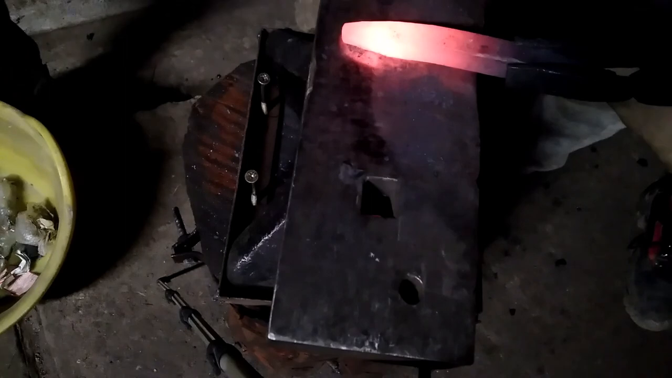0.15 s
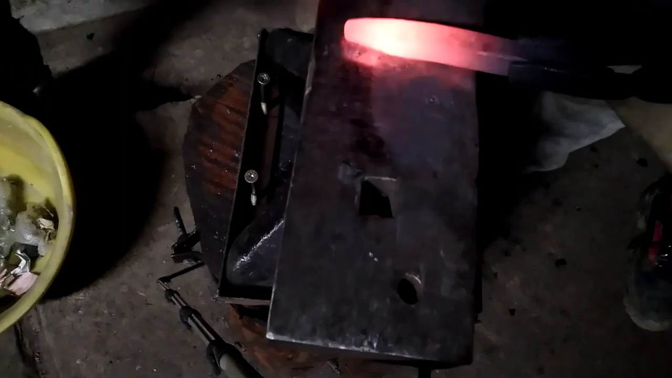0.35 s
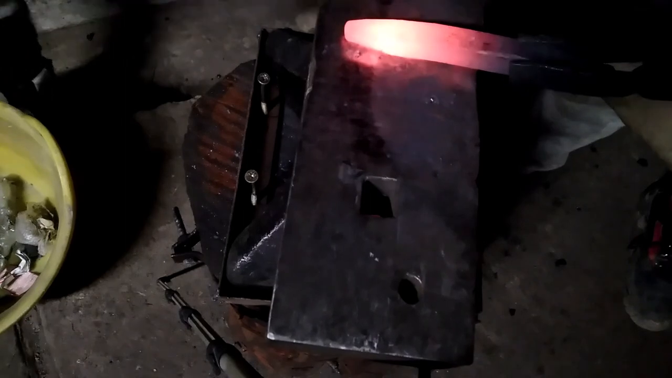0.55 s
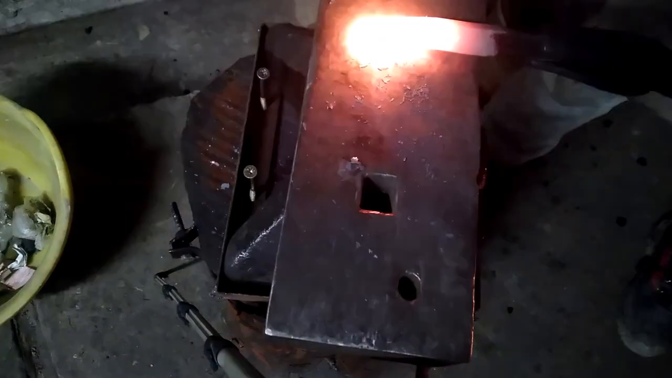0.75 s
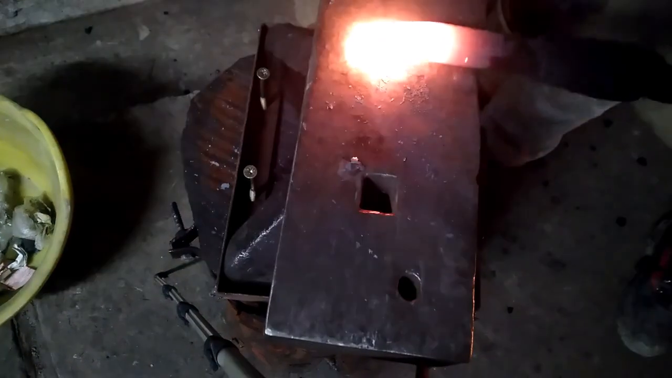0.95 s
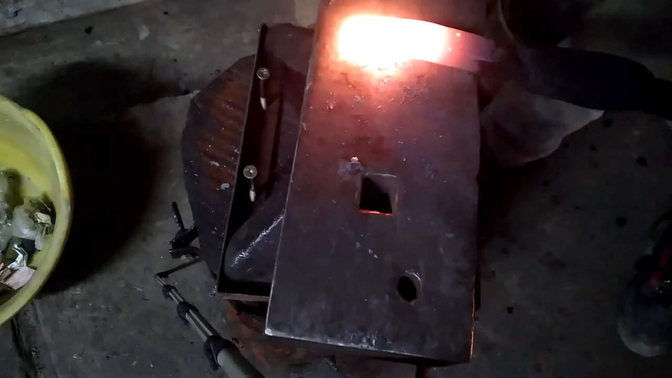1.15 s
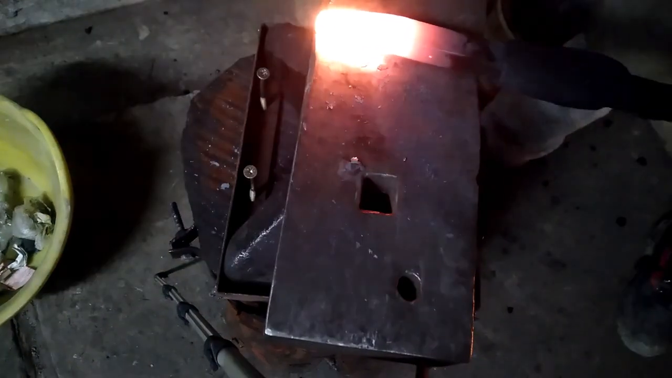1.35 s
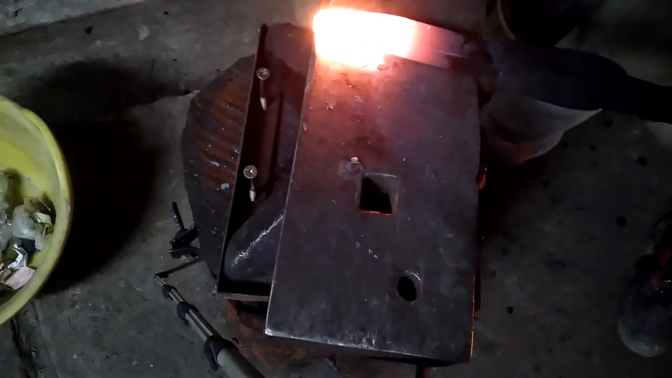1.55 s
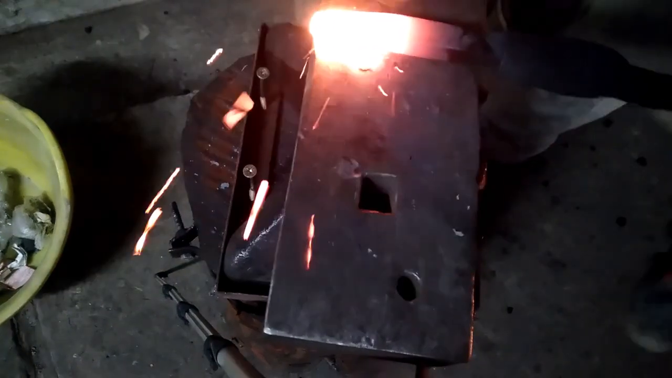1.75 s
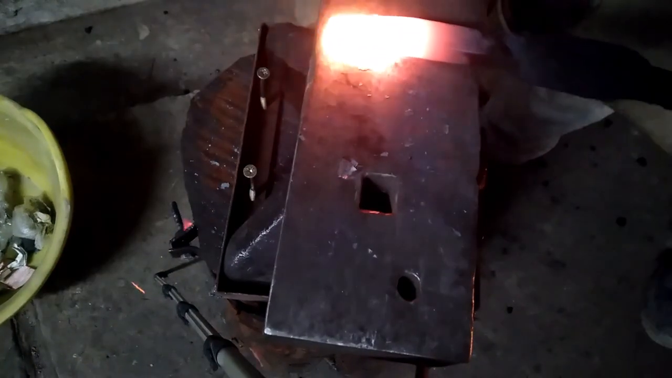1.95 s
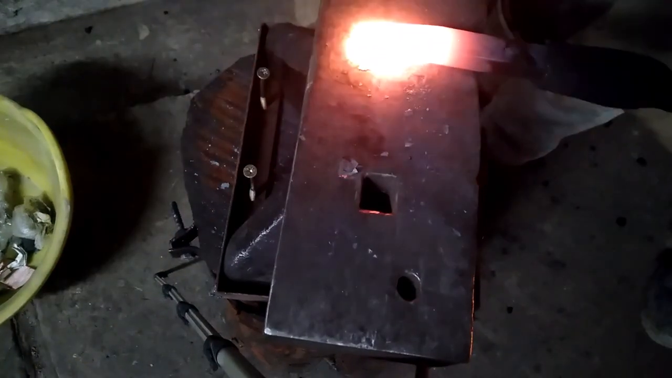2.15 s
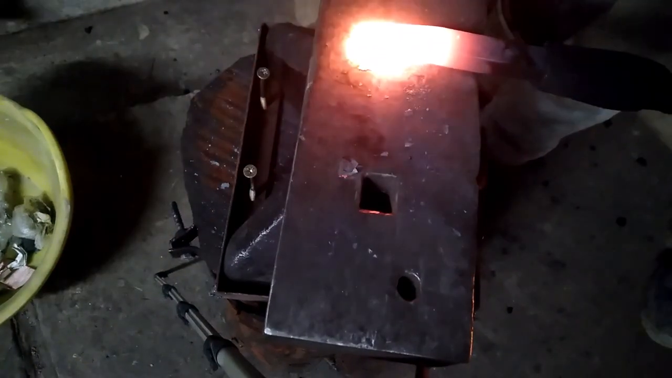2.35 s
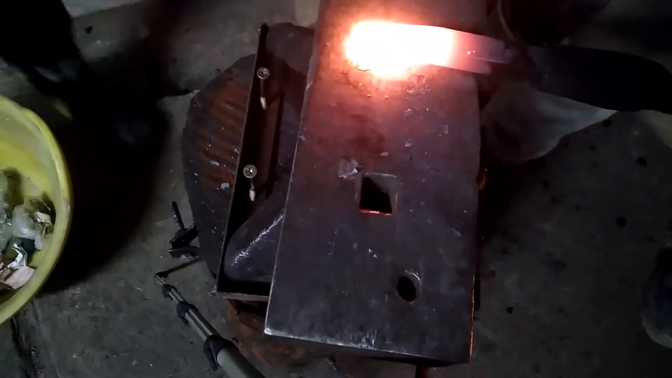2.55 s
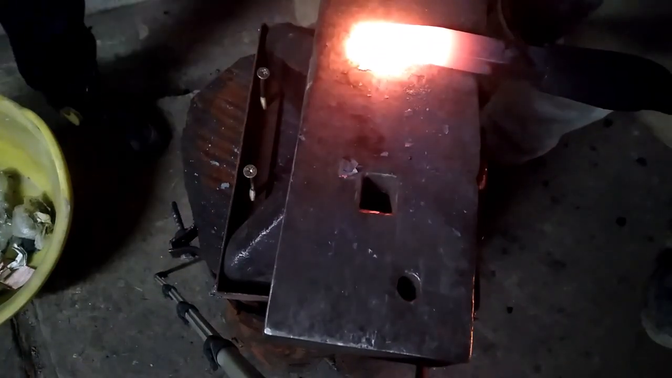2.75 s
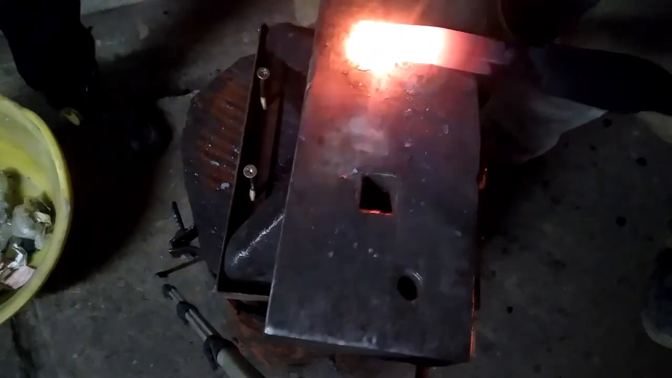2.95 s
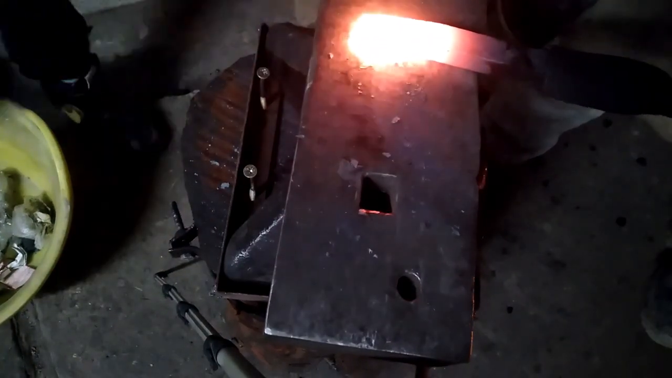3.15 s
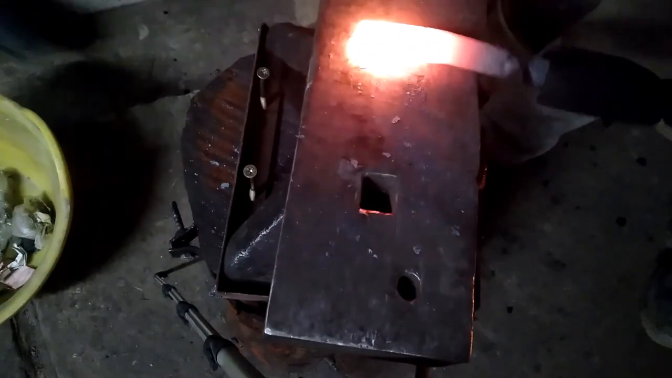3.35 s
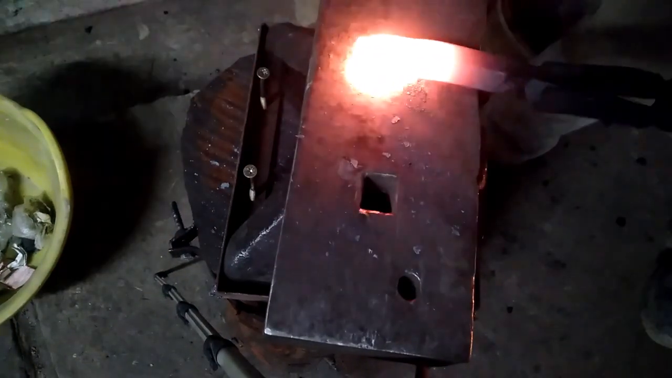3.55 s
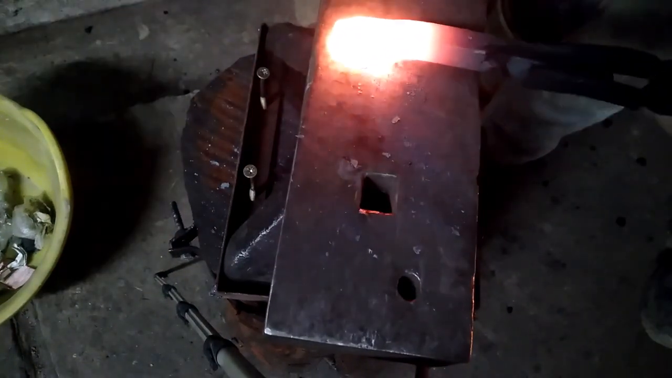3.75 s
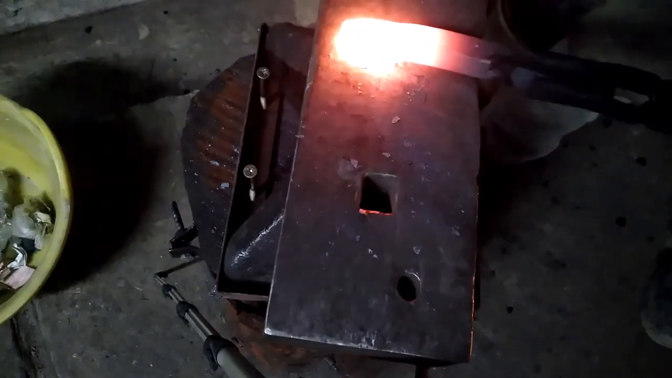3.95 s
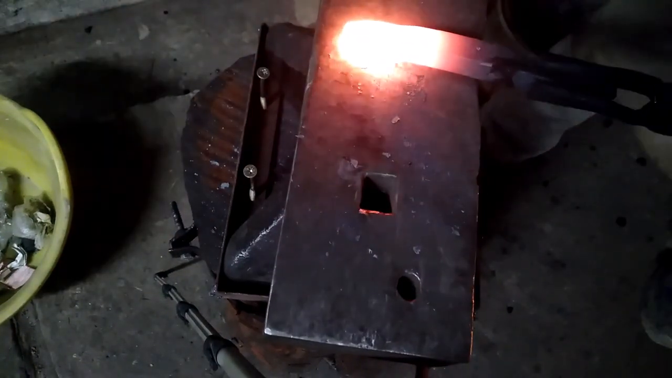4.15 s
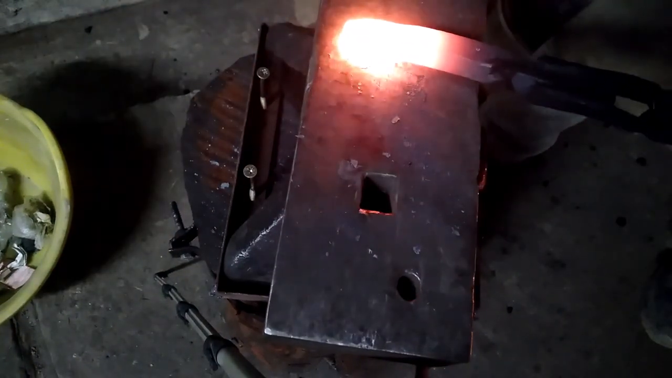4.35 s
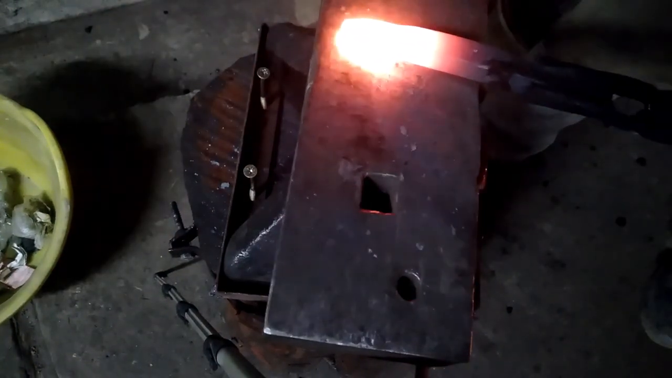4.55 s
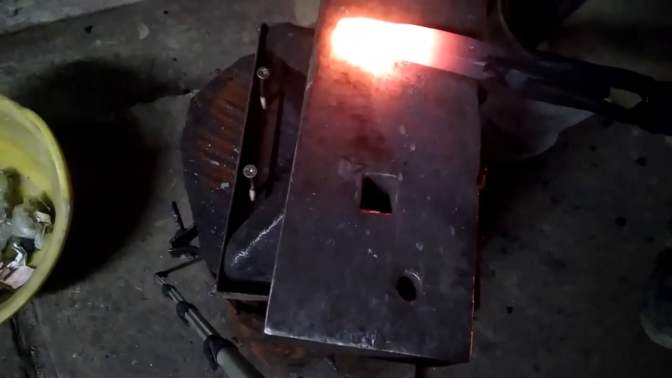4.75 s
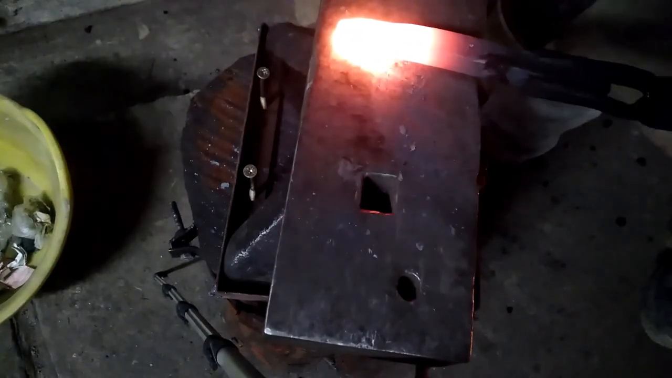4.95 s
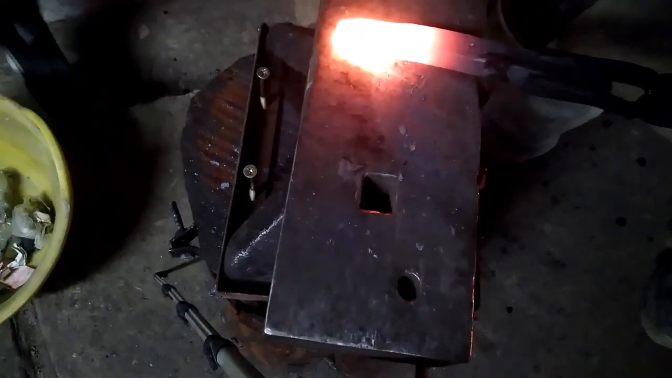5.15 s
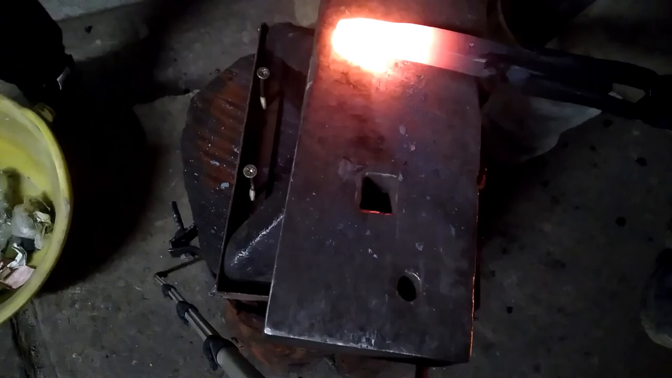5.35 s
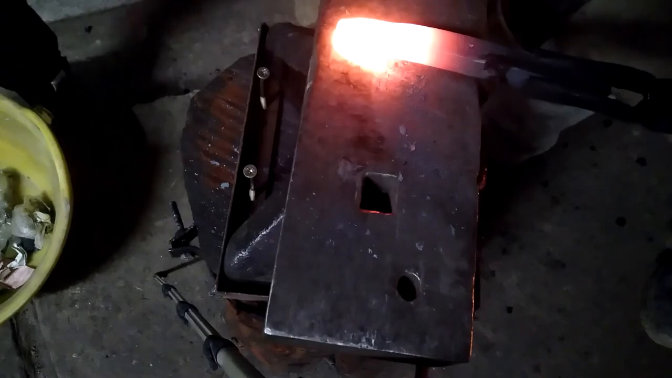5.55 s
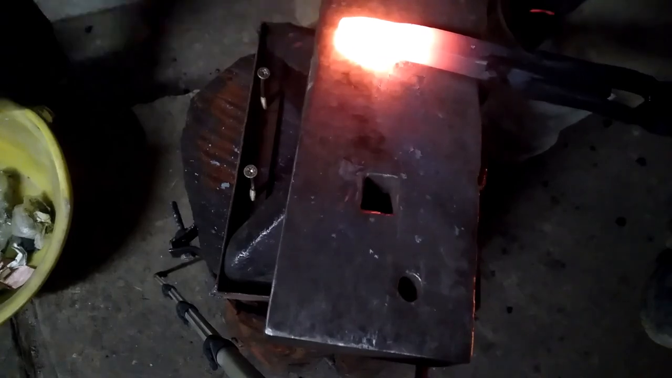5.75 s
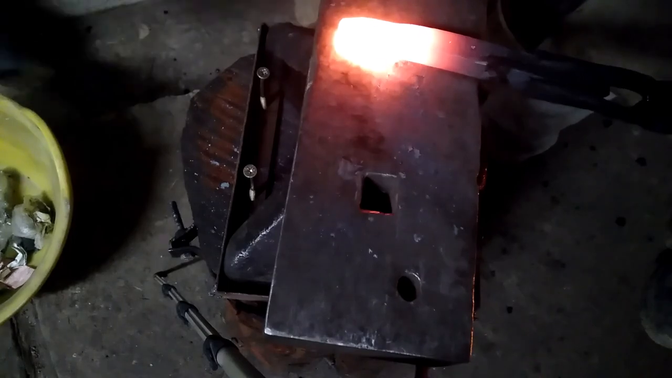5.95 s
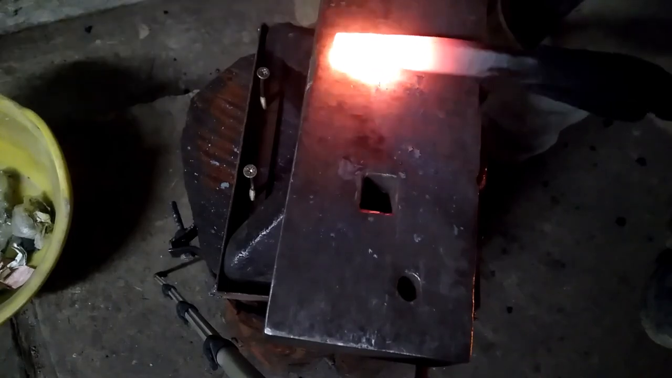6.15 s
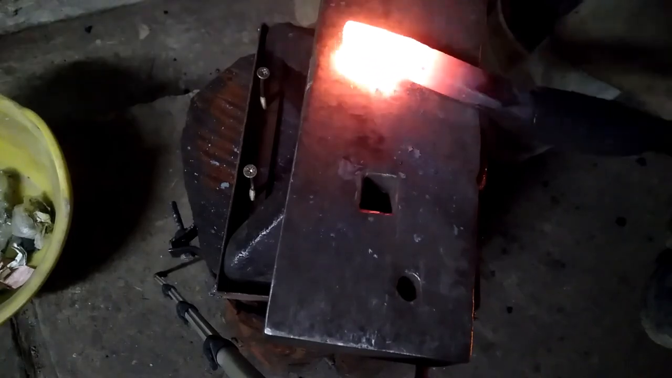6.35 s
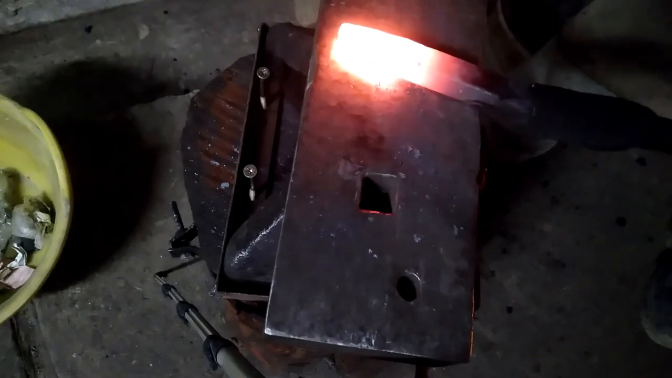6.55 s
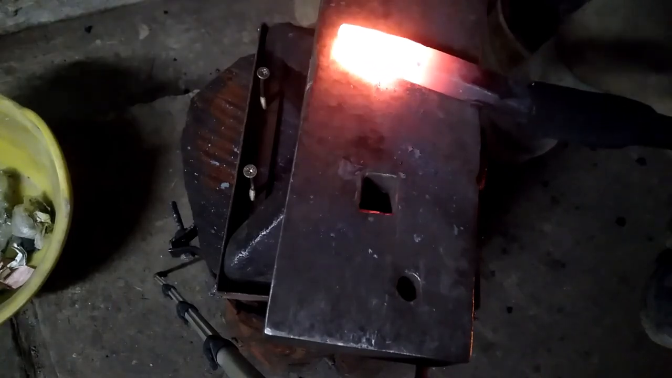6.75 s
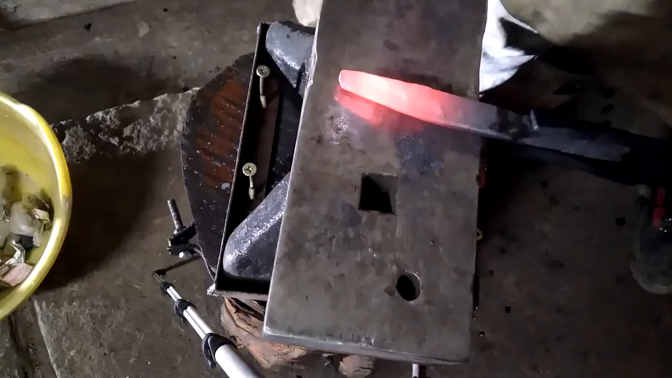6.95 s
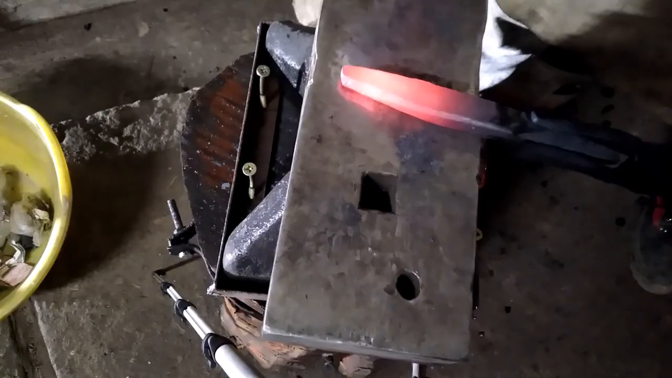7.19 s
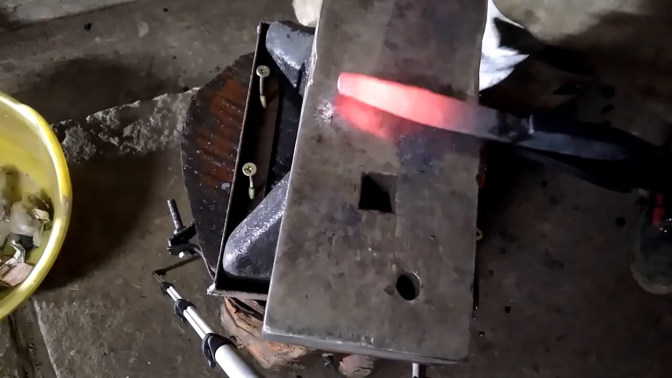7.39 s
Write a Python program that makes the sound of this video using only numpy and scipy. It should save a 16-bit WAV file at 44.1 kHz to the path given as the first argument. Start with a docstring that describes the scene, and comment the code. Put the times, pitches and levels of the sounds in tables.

```python
"""Blacksmith at the anvil

Six heavy blows fall on a glowing bar, heard close up in a small hard-walled forge: noise bursts make the
crack and thump, and decaying sine waves make the anvil ring. Twice the hammer is dropped and bounces to rest.
Between blows the bar scrapes and ticks (filtered noise) over the fluttering rush of the fire (wandering noise).
The blows overload the microphone, which rounds off their peaks."""
import sys
import numpy as np
from scipy import signal
from scipy.fft import rfft, irfft
from scipy.io import wavfile
from scipy.ndimage import uniform_filter1d, minimum_filter1d

SR = 44100
rng = np.random.default_rng(int(sys.argv[2]) if len(sys.argv) > 2 else 0)


def put_to_file(sound):
    """Save the sound as 16-bit audio at rate SR, in the file named by the first command-line argument."""
    columns = np.atleast_2d(sound).T  # one column per channel
    safe = np.clip(columns, -1, 1)
    whole_steps = np.round(safe * 32767)
    wavfile.write(sys.argv[1], SR, whole_steps.astype(np.int16))


N = 327222
RING_S = np.arange(int(1.2 * SR)) / SR  # time axis of one struck sound [s]
LEFT_RIGHT = np.array([[.5], [-.5]])  # splits a difference evenly between the two channels
# In the tables, t60 is the time a sound takes to fall by 60 dB.


def undb(db):
    """Turn decibels into a gain."""
    return 10 ** (np.asarray(db) / 20)


def at(points, hz):
    """Read a table of (frequency, value) between its points, on a log-frequency axis."""
    f, value = np.transpose(points)
    return np.interp(np.log(np.maximum(hz, 1)), np.log(f), value)


def fade(t60):
    """Die away exponentially, by 60 dB in t60 seconds."""
    return np.exp(-np.log(1000) * RING_S / t60)


def build_up(rise_s):
    """Grow smoothly from nothing towards 1."""
    return 1 - np.exp(-RING_S / rise_s)


def add(out, s, sound):
    """Mix a sound in at time s."""
    i = int(s * SR)
    out[:, i:i + sound.shape[-1]] += sound[..., :N - i]


def swell(t, s, width):
    """Make a smooth hump of height 1 around time s."""
    return np.exp(-((t - s) / width) ** 2)


def lowpass(x, hz, order=2):
    """Cut the treble gently above hz."""
    return signal.sosfilt(signal.butter(order, min(hz, SR / 2 - 1), fs=SR, output="sos"), x)


def walk(rate, size):
    """Wander smoothly and at random with a spread near 1: random steps, averaged twice."""
    k = int(SR / rate)
    steps = np.repeat(rng.standard_normal(size // k + 1), k)
    return 1.3 * uniform_filter1d(uniform_filter1d(steps, k), k)[:size]


# likeness of left and right: (frequency [Hz], likeness [0-1])
STEREO_LIKENESS = [(50, 1), (150, 1), (400, 0.4), (1000, 0.24), (3000, 0), (8000, 0.07)]


def noise(spectrum, size):
    """Coloured stereo noise of rms 1; a shared part and an opposed part set how alike the channels are."""
    hz = np.arange(size // 2 + 1) * SR / size
    mid, side = rfft(rng.standard_normal((2, size)))
    alike = np.clip(at(STEREO_LIKENESS, hz), 0, 1)
    shared = mid * np.sqrt(1 + alike)
    opposed = np.outer([1, -1], side) * np.sqrt(1 - alike)
    gain = undb(at(spectrum, hz))
    return irfft((shared + opposed) * gain, size) / np.sqrt(np.mean(gain ** 2))


def burst(spectrum, t60):
    """A contact: noise that starts at full strength and dies away."""
    return noise(spectrum, size=len(RING_S)) * fade(t60)


def click(spectrum, size=2048):
    """A pulse with the given spectrum and its energy as early as possible (minimum phase)."""
    hz = np.arange(size // 2 + 1) * SR / size
    cepstrum = irfft(np.log(undb(at(spectrum, hz))))
    # folding the second half onto the first leaves nothing before the start
    cepstrum[1:size // 2] *= 2
    cepstrum[size // 2 + 1:] = 0
    return irfft(np.exp(rfft(cepstrum)))[:size // 2]


def resonant(spectrum, spread_db):
    """Many close resonances of bar, tongs and hammer: random peaks, drawn afresh on each call."""
    hz = np.arange(20, 16500, 45)
    peaks = np.minimum(rng.exponential(size=len(hz)), 4) - 1
    treble_weight = np.minimum(hz / 7000, 1) ** .5  # the bass stays smoother
    return np.transpose([hz, at(spectrum, hz) + spread_db * peaks * treble_weight])


def ring(modes, spread, waver, waver_rate=35):
    """Decaying sine waves; reflections shift their phase between left and right and make them waver."""
    out = 0
    for hz, db, t60 in modes:
        phase = 2 * np.pi * hz * RING_S + LEFT_RIGHT * spread * rng.choice([-1, 1])
        swing = waver * np.array([walk(waver_rate, size=len(RING_S)) for _ in range(4)])
        wave = (1 + swing[:2]) * np.sin(phase) + swing[2:] * np.cos(phase)
        out = out + undb(db) * fade(t60) * wave
    return out


# reverberation of the forge: (frequency [Hz], t60 [s])
FORGE_ROOM = [(40, 1), (150, 1), (350, 0.41), (900, 0.5), (2000, 0.45), (4000, .39), (8500, 0.29),
              (12000, 0.2), (16000, 0.27)]


def reverberation(spectrum):
    """Dense reflections of a short burst off the walls; each band dies at its own rate."""
    hz = np.fft.rfftfreq(len(RING_S), 1 / SR)
    wash = rfft(noise(spectrum, size=len(RING_S)))
    centres = [f for f, _ in FORGE_ROOM]
    out = 0
    for share, (_, t60) in zip(np.eye(len(FORGE_ROOM)), FORGE_ROOM):
        band = irfft(wash * at(list(zip(centres, share)), hz))  # overlapping bands that add up to the whole
        out = out + band * fade(t60)
    return out


# colour of the fire's noise: (frequency [Hz], relative level [dB])
FIRE_SPECTRUM = [(20, 0.5), (60, -0.5), (130, -5), (260, 3.5), (500, -5), (750, -9.5), (1050, -11.5),
                 (1500, -16), (3200, -17.5), (5000, -25.5), (9000, -26.5), (15500, -38)]
# loudness of the fire's rush: (time [s], level [dB])
FIRE_RUSH = [(0, -55.5), (.2, -60), (.6, -52.5), (.75, -47.5), (1.2, -47.5), (1.6, -41), (3.5, -42.5),
             (3.95, -48.5), (4.3, -44.5), (5.0, -43.5), (5.3, -50), (6.24, -52), (6.32, -44.5),
             (6.74, -52.5), (6.81, -62.5), (7.07, -66), (7.42, -48)]
# a thin whistle in the draught swells and fades: (time of its height [s], half width at 1/e [s], level [dB])
DRAUGHT_WHISTLE = [(.92, .2, -55), (1.57, 0.092, -45.5)]


def fire(flutter_db=1, roar_db=3.0, whistle_hz=1088):
    """A rush that flutters with the draught; each low band of its roar comes and goes on its own."""
    t = np.arange(N) / SR
    rush = noise(FIRE_SPECTRUM, size=N)
    roar = 0
    for hz in 180 * 2 ** (np.arange(7) / 3):  # bands a third of an octave wide
        edges = [hz * 2 ** (-1 / 6), hz * 2 ** (1 / 6)]
        band = signal.sosfiltfilt(signal.butter(2, edges, "band", fs=SR, output="sos"), rush)
        roar = roar + band * (undb(roar_db * walk(14, size=N)) - 1)
    rush_db = np.interp(t, *np.transpose(FIRE_RUSH)) + flutter_db * walk(14, size=N)
    pitch_hz = whistle_hz + 18 * walk(60, size=N)
    whistle = np.sin(2 * np.pi * np.cumsum(pitch_hz) / SR)
    whistle_gain = sum(undb(db) * swell(t, s, width) for s, width, db in DRAUGHT_WHISTLE)
    return (rush + roar) * undb(rush_db) + whistle * whistle_gain


# colour of the crack: (frequency [Hz], relative level [dB])
CRACK_SPECTRUM = [(20, 2), (60, 6), (170, 5), (280, -3), (600, -1.5), (880, 2.5), (1350, -3), (1900, 3),
                  (2600, -5.5), (3400, 0.5), (4700, -8.5), (7000, -10.5), (9200, -5.5), (15500, -15.5)]


def crack(body_db, crack_db=-3, crack_t60=0.031, room_db=-7, rough_db=1.6, treble_per_clang=0.35):
    """Scale crushes under the hammer; a harder contact clangs more (body_db) and cracks brighter."""
    spectrum = resonant(CRACK_SPECTRUM, 4.4)
    direct = undb(crack_db) * burst(spectrum, crack_t60)
    room = undb(room_db) * reverberation(spectrum) * build_up(0.0092)
    rough = (direct + room) * undb(rough_db * walk(180, size=len(RING_S)))  # reflections arrive in clusters
    dull = lowpass(rough, 3500, order=1)
    return dull + undb(treble_per_clang * body_db) * (rough - dull)


# colour of the hammer's clack on steel: (frequency [Hz], relative level [dB])
CLACK_SPECTRUM = [(100, -8.5), (600, -18), (730, -15), (830, 8), (980, 2), (1200, -4), (2200, -5),
                  (3900, -6), (4600, -18), (9200, -13), (15500, -20.5)]


def clack(t60):
    """Hammer or bar touching the face: a short noise burst."""
    return burst(CLACK_SPECTRUM, t60)


# the hammer head's ringing: (frequency [Hz], relative level [dB], t60 [s])
HEAD_MODES = [(3776, -5, .16), (3840, 7, 0.22), (3970, -1.5, 0.24), (4030, 0, .23), (5889, -4, 0.41),
              (6600, -13, 0.56), (7200, -7.5, 0.3), (9200, 0, 0.28), (9520, -12, 0.24)]


def hammer_head():
    """The rough, short ring of the hammer's head."""
    return ring(HEAD_MODES, spread=1.5, waver=1.6, waver_rate=170)


# the anvil's main note, a close pair: (frequency [Hz], relative level [dB], t60 [s])
ANVIL_NOTE = [(3452, 0, .56), (3452.3, -27, 1.05)]


def note():
    """The anvil's clean main note."""
    return ring(ANVIL_NOTE, spread=.75, waver=.13, waver_rate=25)


# hammer on hot steel; where it lands decides which modes ring: (time [s], crack and thud level [dB],
# main note and hammer head level [dB], high overtones level [dB], snap and boom level [dB], clang level [dB])
HAMMER_BLOWS = [(0.2647, -1, -13.5, -5, 0.5, 3.5), (1.6546, 4, 8.5, 4, 5, 0), (2.972, 0.5, 0, -10, 1.5, 2),
                (4.3682, -1.5, -6.5, -6, 3, -10), (5.6244, -0.5, 2.5, 2.5, 0.5, 4.5),
                (7.1392, -6, 8.5, -22, -5.5, -1.5)]
# dull knock of the anvil on its stand: (frequency [Hz], relative level [dB])
STAND_THUD = [(60, -1), (210, -0.5), (320, -3.5), (470, -1.5), (700, -10.5), (1500, -30.5), (8000, -58)]
# the clang of the anvil's body: (frequency [Hz], relative level [dB], t60 [s])
BODY_CLANG = [(816, -7, .45), (895, -8, .4), (932, -8, .4), (1808, -7, .4), (1946, -4, .45),
              (3241, -4, .52), (3895, -8, .35), (5792, -14, .28), (5885, -14, .3)]
# the anvil's high overtones: (frequency [Hz], relative level [dB], t60 [s])
HIGH_OVERTONES = [(6651, -5, .3), (7454, -3, .17), (7769, -3, .6), (9097, -8, .26), (12240, -10, .17),
                  (13160, -12, .17), (15560, -4, .2)]
# stand, floor and lowest room modes: (frequency [Hz], relative level [dB], t60 [s])
LOW_BOOM = [(7, 14, .2), (58.3, -9, 1.81), (63.5, -6, 1.32), (84.8, -8, 0.34), (108, -3, 1),
            (133.2, -12, 0.78), (160, -9.5, 0.44), (192, -8, .6)]


def blows(snap_db=-1, snap_t60=0.01, thud_db=-6, thud_t60=0.053, note_db=-4, clang_db=-15, overtone_db=-14,
          boom_db=-15, head_db=-33, cushion_hz=5500, swell_s=0.028, pan_db=-0.4):
    """Scale cracks under the hammer, the stand thumps, and the anvil's note builds up in the room."""
    out = np.zeros((2, N))
    for s, force_db, main_db, over_db, thump_db, body_db in HAMMER_BLOWS:
        blow = undb(force_db) * (crack(body_db) + undb(thud_db) * burst(STAND_THUD, thud_t60))
        blow += undb(snap_db + thump_db) * clack(snap_t60)  # first touch of the hammer
        head = lowpass(hammer_head(), cushion_hz)  # the hot steel cushions the hammer
        main_note = note() * build_up(swell_s)
        blow += undb(main_db) * (undb(note_db) * main_note + undb(head_db) * head)
        blow += undb(clang_db + body_db) * ring(BODY_CLANG, spread=2.54, waver=0.64)
        blow += undb(overtone_db + over_db) * ring(HIGH_OVERTONES, spread=1.86, waver=0.31, waver_rate=50)
        blow += undb(boom_db + thump_db) * ring(LOW_BOOM, spread=0.71, waver=0.22, waver_rate=32)
        add(out, s, blow * undb(pan_db * LEFT_RIGHT))  # pan_db is left minus right
    return out


# the bar slapping back on the face just after a blow: (time [s], level [dB])
BAR_SLAPS = [(0.326, -15), (.357, -14), (3.023, -8), (3.074, -11), (3.105, -16.5), (4.419, -8.5),
             (4.446, -16), (5.654, -4.5)]


def slaps():
    """The bar slaps back on the anvil: short clacks with their treble cut."""
    out = np.zeros((2, N))
    for s, db in BAR_SLAPS:
        add(out, s, undb(db) * lowpass(clack(0.045), 4500))
    return out


def afterring(start_s=.68, note_db=-46, hum_db=-38):
    """A faint anvil note and the room's lowest hum enter around the first dip in level and die away."""
    out = np.zeros((2, N))
    note_hz = ANVIL_NOTE[0][0]
    add(out, start_s, undb(note_db) * ring([(note_hz, 0, 1.1)], spread=0.64, waver=.13))
    add(out, start_s, undb(hum_db) * ring([(54.4, 0.0093, 1.5)], spread=.5, waver=.1))
    return out


# bar dragged over loose scale: (time [s], level [dB], t60 [s], treble cut [Hz])
BAR_SCRAPES = [(.69, -49, 1, 8880), (1.48, -40, .45, 7000), (2.325, -34.5, 0.62, 12000),
               (2.555, -37.5, 1, 9200), (2.82, -38.5, 0.99, 12300), (3.55, -45, 0.63, 4000),
               (3.77, -42.5, 0.55, 8000), (4.015, -42, 1, 9900), (4.25, -45.5, 1, 10500),
               (4.92, -46.5, 0.81, 9000), (5.34, -47, .58, 2400), (6.118, -49.5, 0.26, 2200),
               (6.3, -46, 0.41, 4500)]
# colour of the scale's grit: (frequency [Hz], relative level [dB])
SCALE_SPECTRUM = [(150, -10), (500, 8.5), (1000, 1.5), (1600, -1), (3300, 0), (5000, -9), (7000, -11),
                  (8800, -7.5), (11000, -19.5), (15500, -21.5)]


def scrapes(grit_db=2, wobble_db=0.8, rise_s=.035):
    """The bar is turned between blows: gritty noise slides over the scale with an uneven grip."""
    out = np.zeros((2, N))
    for s, db, t60, bright_hz in BAR_SCRAPES:
        release = np.minimum(fade(t60) * 1000 ** (rise_s / t60), 1)  # the fade begins once the rise is done
        push = np.minimum(RING_S / rise_s, 1) * release
        grit = lowpass(noise(resonant(SCALE_SPECTRUM, 4.7), size=len(RING_S)), bright_hz)
        grip_db = grit_db * walk(87, size=len(RING_S)) + wobble_db * walk(28, size=len(RING_S))
        add(out, s, push * undb(db + grip_db) * grit)
    return out


# lighter knocks fall at random while the bar is worked: (start [s], end [s])
WORKING_TIME = (.8, 6.7)


def light_ticks(count=8, level_db=-44, spread_db=2):
    """Rows (time [s], level [dB]) of faint knocks, one at random in each equal slice of the working time."""
    slot, strength = rng.random((count, 2)).T
    times = np.interp(np.arange(count) + slot, [0, count], WORKING_TIME)
    return list(zip(times, level_db + spread_db * (2 * strength - 1)))


# bar and tongs knocking on the face: (time [s], level [dB])
BAR_TICKS = [(1.2976, -31), (3.4231, -35.5), (3.6208, -31.5), (4.0225, -33.5), (4.9696, -33.5),
             (6.305, -22.5)]
# colour of those knocks: (frequency [Hz], relative level [dB])
TICK_SPECTRUM = [(200, -4.5), (1000, -6.5), (2500, -1.5), (4000, -0.5), (5000, -3.5), (7500, -1.5),
                 (10000, -3.5), (15500, -11)]


def ticks(tick_db=-9, tick_t60=0.078, room_db=-21, steel_db=-32):
    """Bar and tongs knock on the anvil: a noise burst, its reflections and a small steely ring."""
    out = np.zeros((2, N))
    room = undb(room_db) * reverberation(resonant(TICK_SPECTRUM, 4.6))
    steel = undb(steel_db) * ring(HEAD_MODES, spread=1.5, waver=0.53, waver_rate=110)
    for s, db in BAR_TICKS + light_ticks():
        contact = undb(tick_db) * burst(resonant(TICK_SPECTRUM, 2.6), tick_t60)
        add(out, s, undb(db) * (contact + room + steel))
    return out


# hammer let fall on the bare face: (time [s], level [dB], treble cut at first touch [Hz], first flight [s],
# share kept per bounce [0-1], fall per bounce [dB], number of touches)
HAMMER_DROPS = [(1.9095, -1.5, 7820, .0822, .59, 2.6, 11), (4.672, -1.5, 5860, .0726, .41, 6.5, 5)]
# the hammer's knock as the walls return it: (frequency [Hz], relative level [dB])
WALL_KNOCK = [(100, -10.5), (600, -9.5), (850, 4), (1200, -5.5), (2200, -4), (3900, -4), (4600, -15),
              (9200, -8), (15500, -16.5)]


def bounces(touch_db=7, clack_db=-3, clack_t60=0.029, room_db=-22, head_db=-29, note_db=-27, boom_db=-26,
            dulling=0.84, chatter_s=0.0099):
    """Each rebound is slower, so it comes back sooner, softer and duller; anvil and stand answer faintly."""
    out = np.zeros((2, N))
    boom = ring(LOW_BOOM, spread=0.32, waver=0.51, waver_rate=14.76)
    answer = undb(note_db) * note() + undb(boom_db) * boom
    touch = undb(touch_db) * click(CLACK_SPECTRUM)
    touch = np.pad(touch, (0, len(RING_S) - len(touch)))
    for s, db, bright_hz, first_s, kept, fall_db, count in HAMMER_DROPS:
        room = undb(room_db) * reverberation(resonant(WALL_KNOCK, 2.5)) * build_up(0.0073)
        head = undb(head_db) * hammer_head()
        for k in range(round(count)):
            # flights shrink towards chatter_s as the hand presses the hammer down
            flight_s = chatter_s + (first_s - chatter_s) * kept ** k
            clank = touch + undb(clack_db) * clack(clack_t60) + room + head
            cut_hz = bright_hz * (flight_s / first_s) ** dulling
            add(out, s, undb(db - fall_db * k) * (lowpass(clank, cut_hz, order=3) + answer))
            s += flight_s
    return out


# the level dips briefly: (time [s], half width at 1/e [s], level at the bottom [dB])
LEVEL_DIPS = [(0.678, 0.017, -31), (7.01, 0.026, -23)]


def scene():
    """All sources together; twice the level dips briefly."""
    t = np.arange(N) / SR
    dip_db = sum(db * swell(t, s, width) for s, width, db in LEVEL_DIPS)
    forging = blows() + slaps() + afterring() + scrapes() + ticks() + bounces()
    return (fire() + forging) * undb(dip_db)


# the microphone's tone: (frequency [Hz], level [dB])
MIC_TONE = [(20, -3.5), (9200, 1.5), (10300, -9), (15500, -13.5)]


def record(dry, overload=1.0, ceiling=1.0, hold_s=.003, top_hz=15700):
    """The microphone saturates and colours the tone; a fast limiter holds the peaks; the top treble is cut."""
    x = overload * np.tanh(dry / overload)
    x = signal.fftconvolve(x, click(MIC_TONE)[None], axes=1)[:, :N]
    hold = max(int(hold_s * SR), 1)
    gain = ceiling / np.maximum(np.abs(x), ceiling)
    x = x * uniform_filter1d(minimum_filter1d(gain, hold), hold)
    return signal.sosfilt(signal.ellip(8, .2, 60, top_hz, fs=SR, output="sos"), x)


dry = scene()
out = record(dry)
put_to_file(out)
```